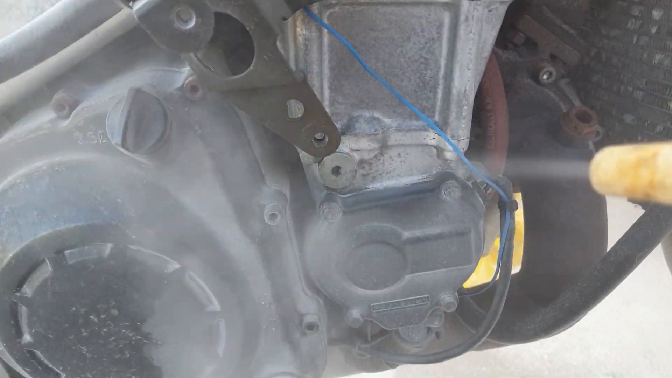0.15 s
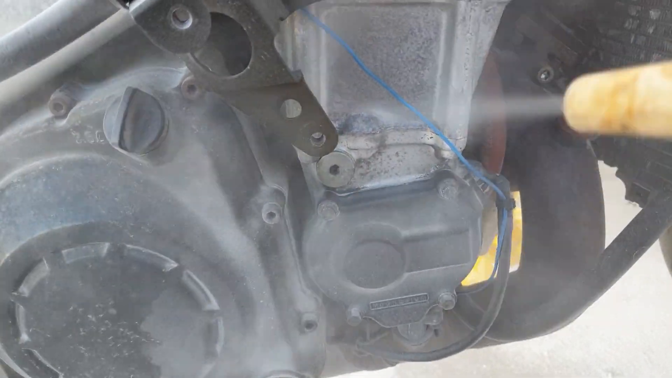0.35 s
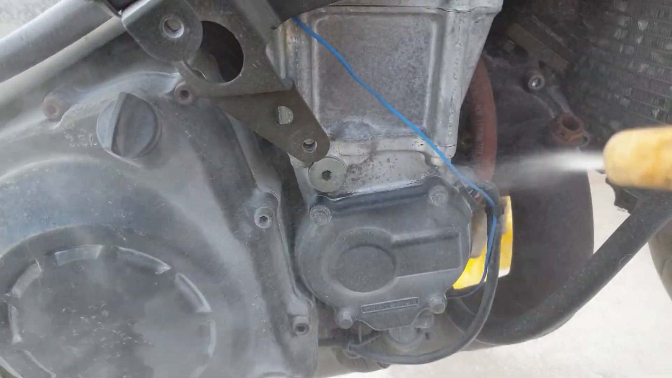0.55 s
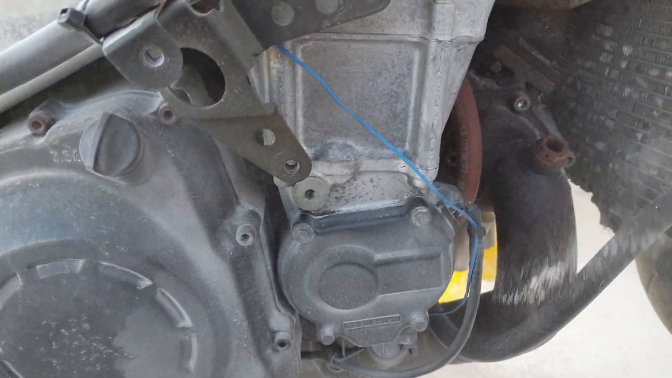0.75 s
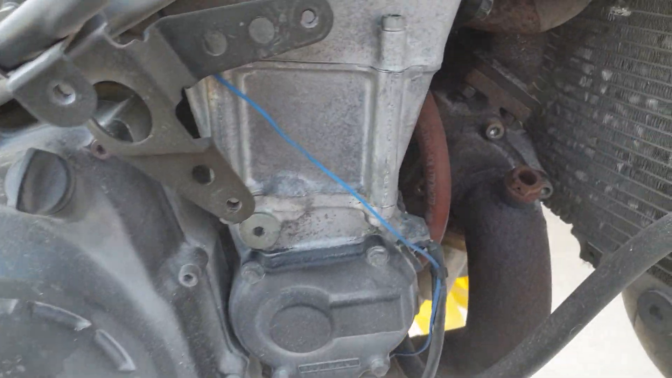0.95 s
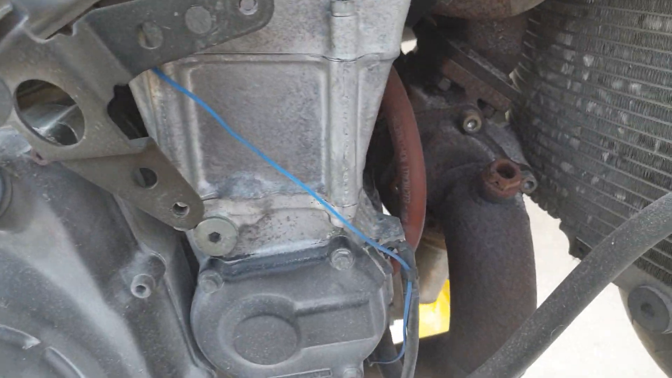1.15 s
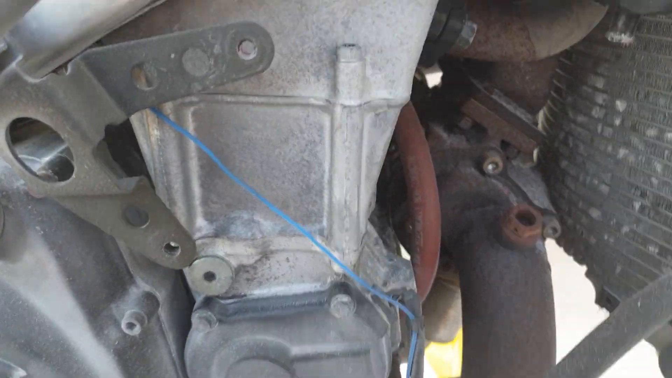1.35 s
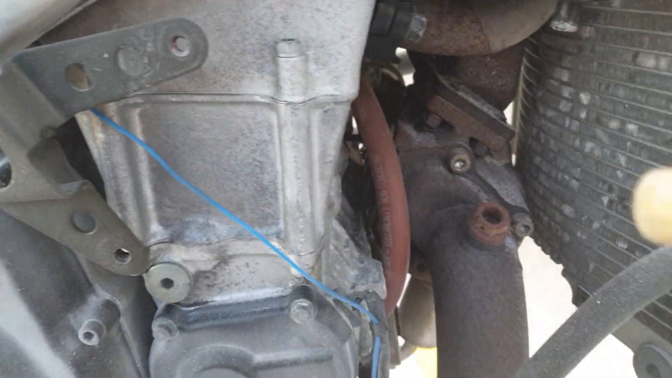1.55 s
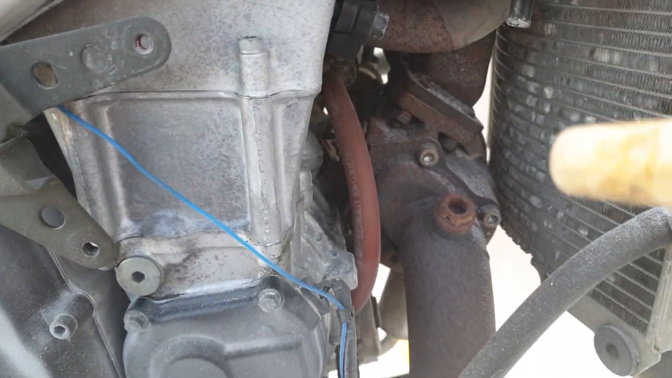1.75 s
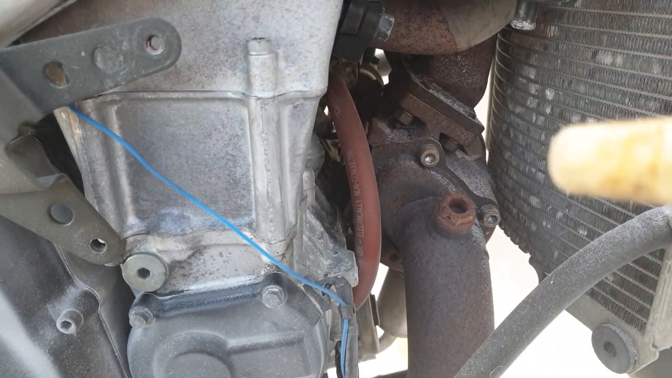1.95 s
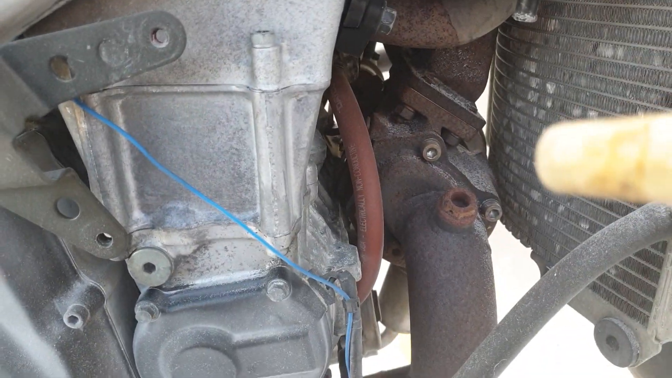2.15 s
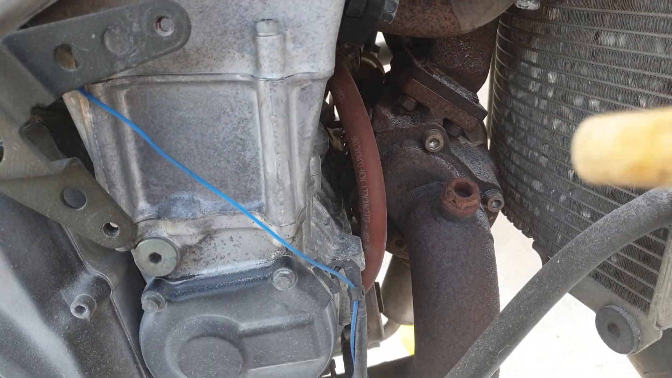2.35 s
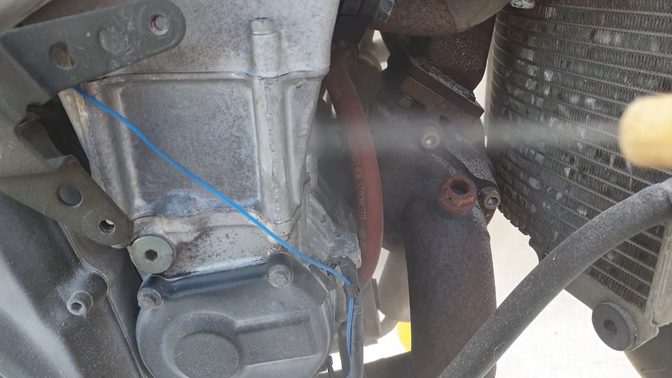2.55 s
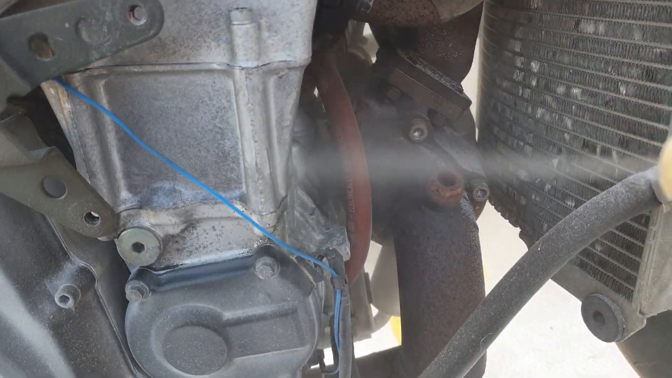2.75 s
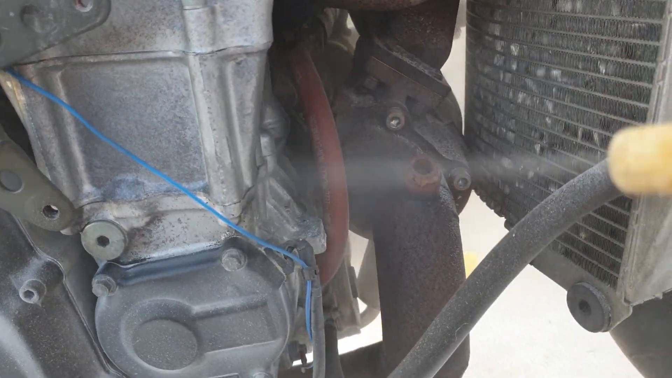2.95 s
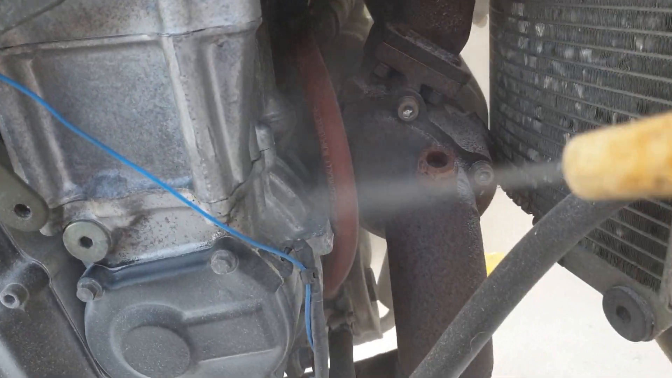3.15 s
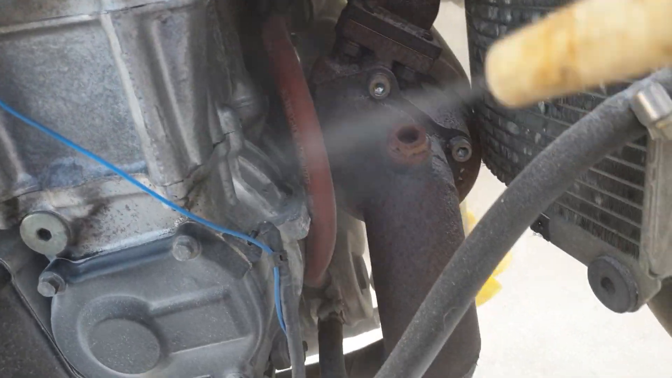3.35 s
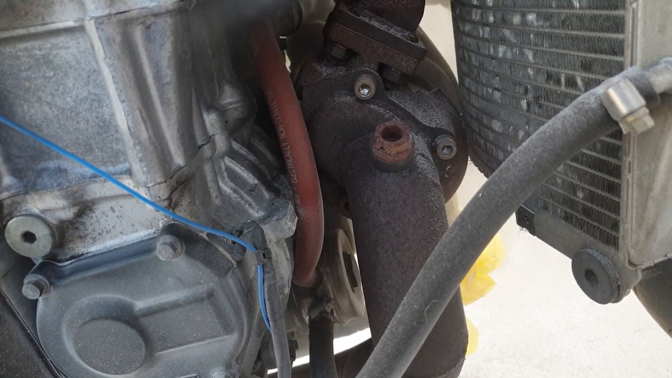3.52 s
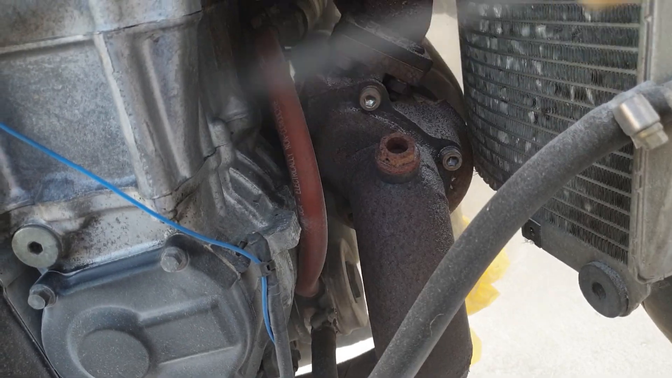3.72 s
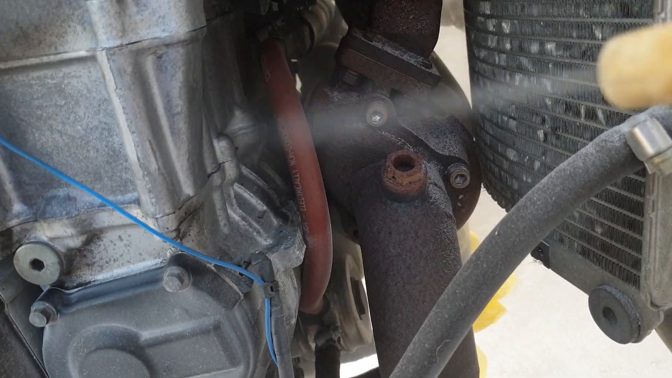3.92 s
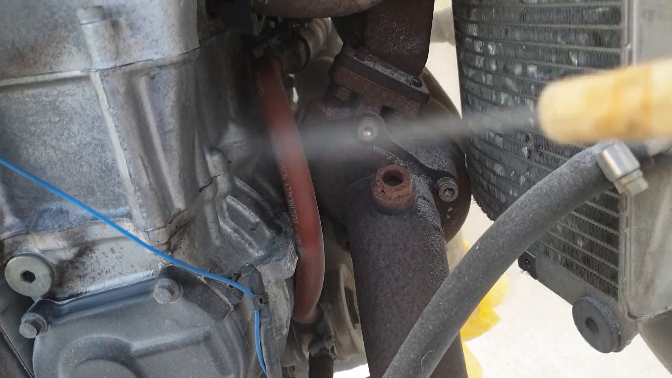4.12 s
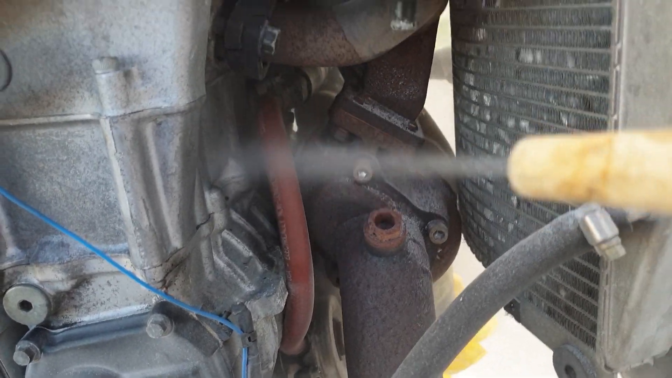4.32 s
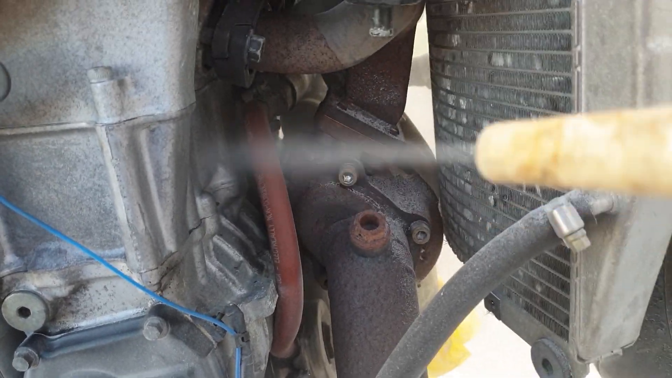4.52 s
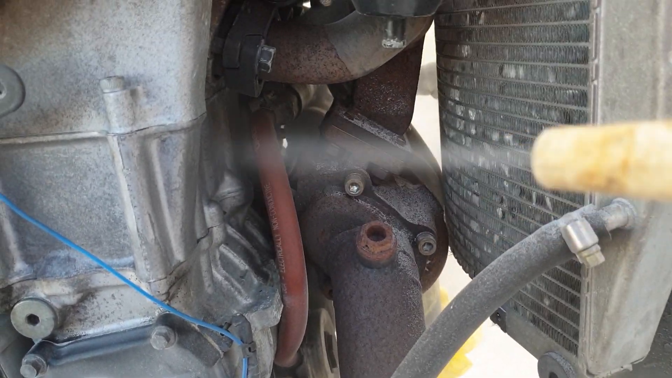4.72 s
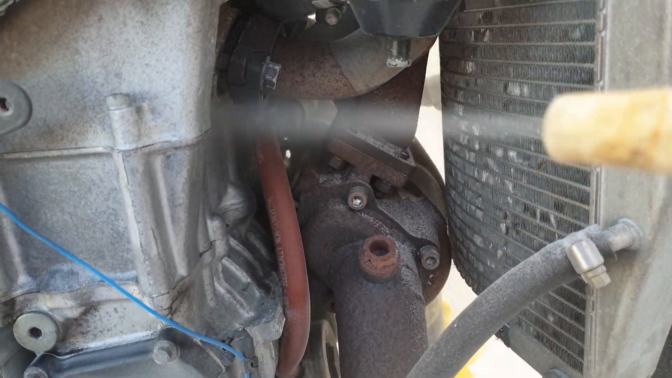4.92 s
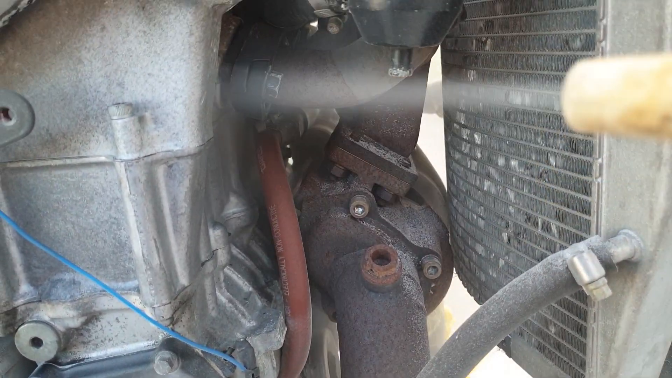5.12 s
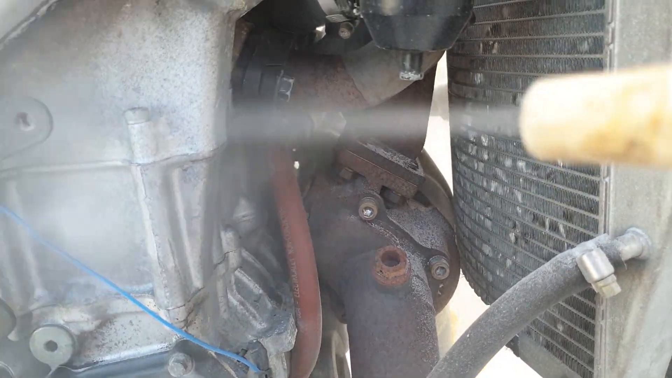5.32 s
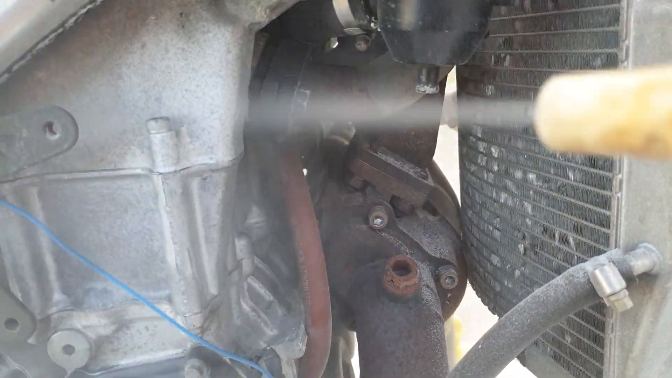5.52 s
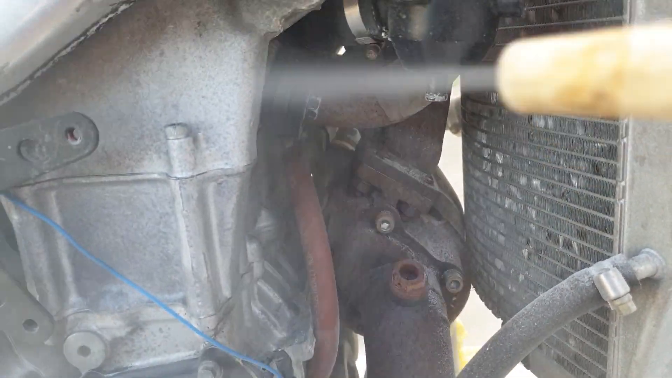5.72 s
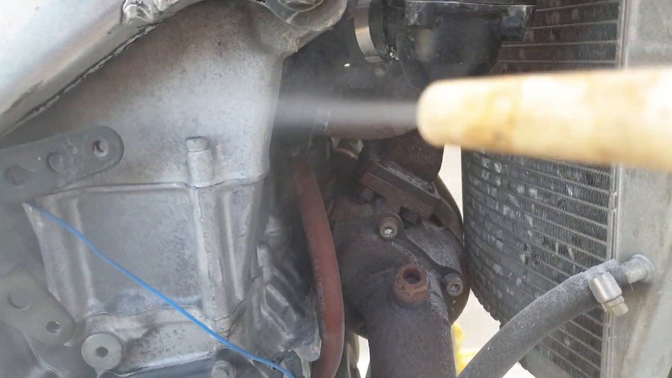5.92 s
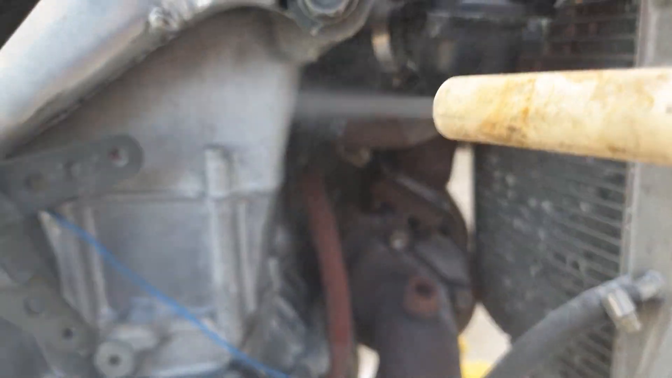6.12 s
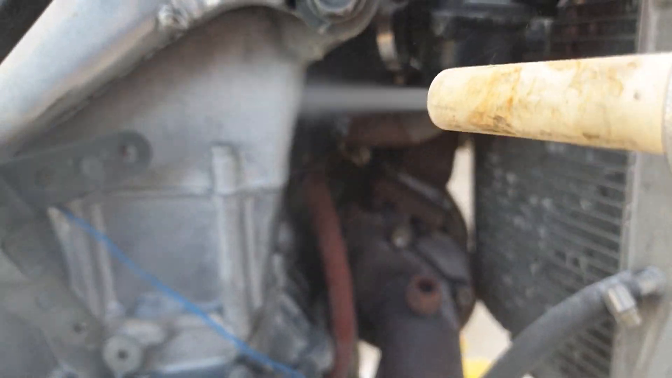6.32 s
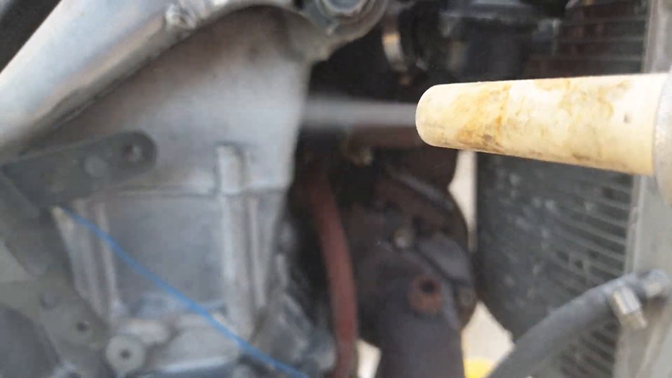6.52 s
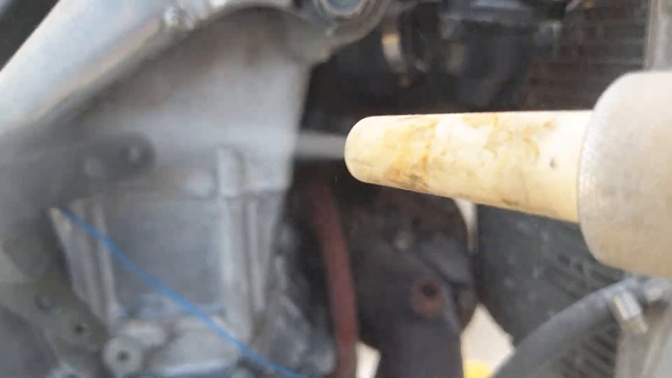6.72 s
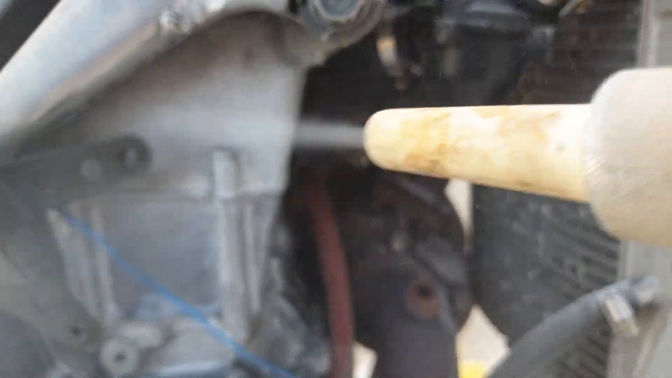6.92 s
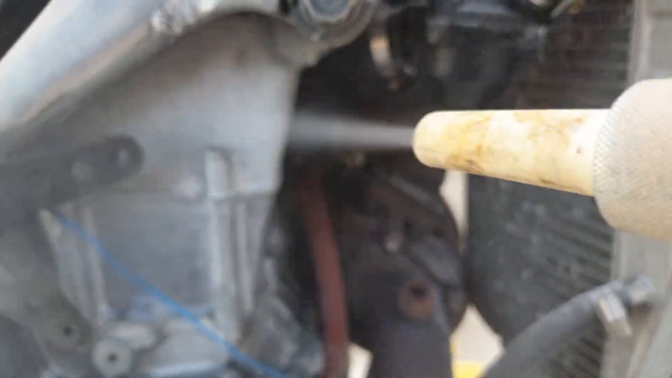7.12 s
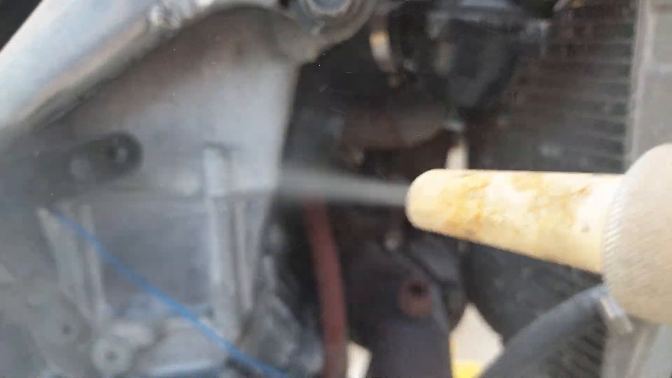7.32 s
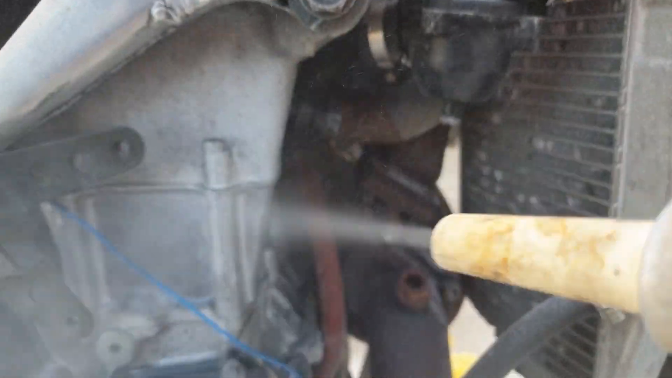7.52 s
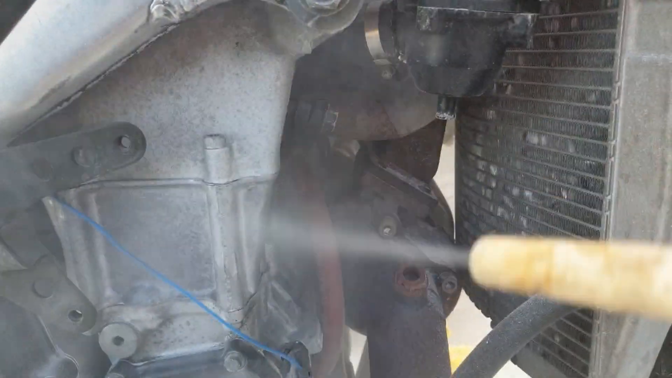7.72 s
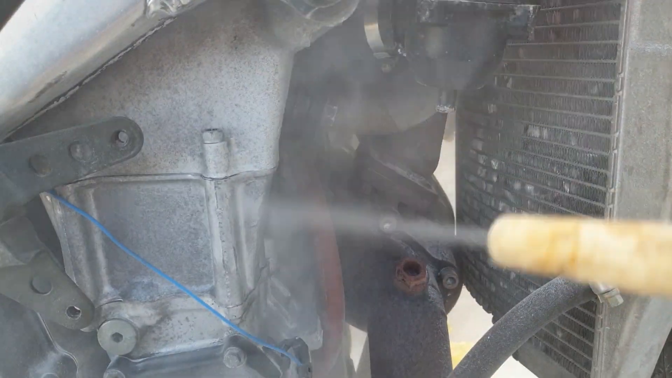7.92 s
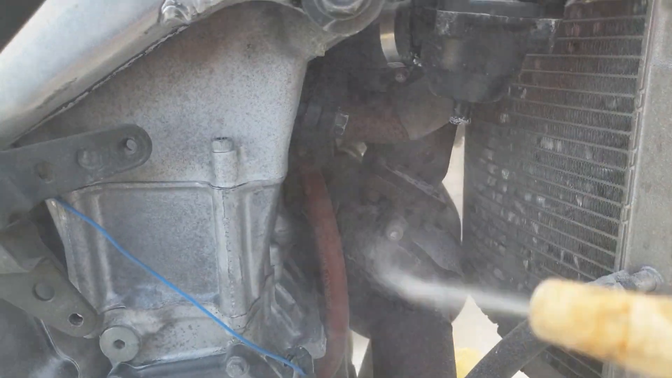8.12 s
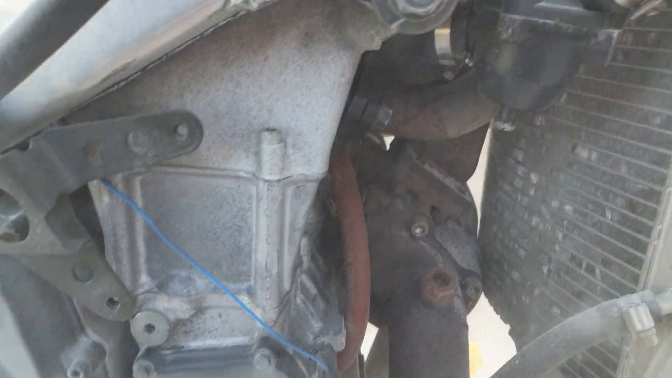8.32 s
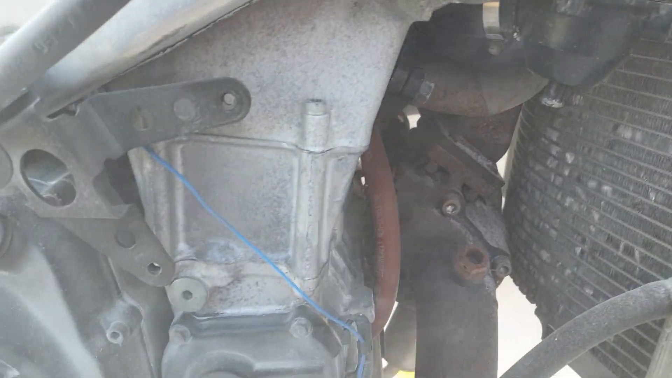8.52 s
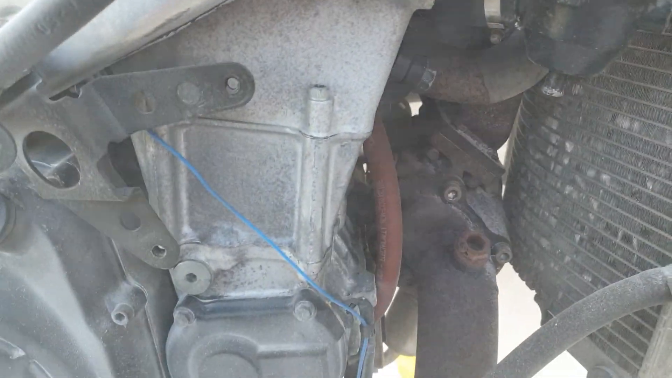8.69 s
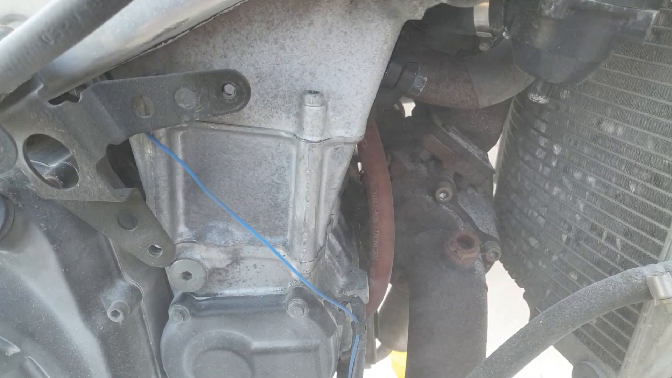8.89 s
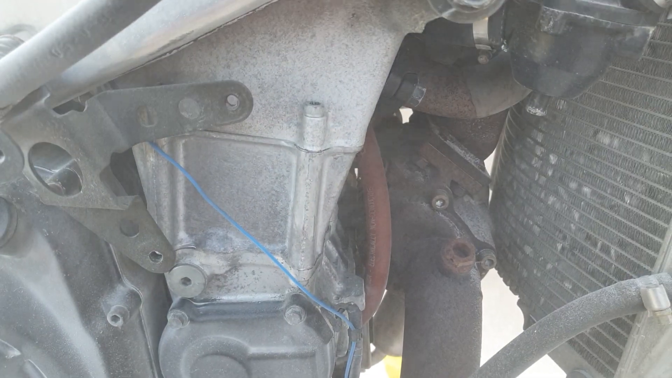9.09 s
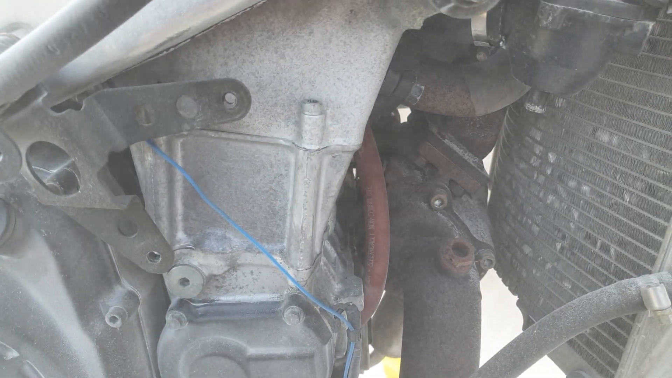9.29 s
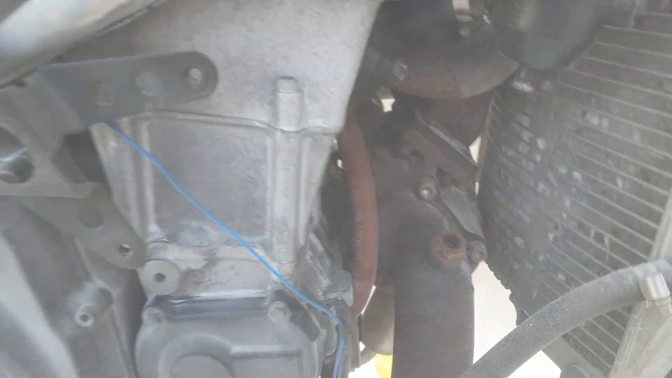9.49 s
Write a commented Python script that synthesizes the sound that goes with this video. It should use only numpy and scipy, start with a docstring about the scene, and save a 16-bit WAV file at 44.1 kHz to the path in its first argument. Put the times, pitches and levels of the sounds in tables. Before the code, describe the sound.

A dense, very bright hiss of compressed air and powder is already running at 0 s, close and leaning left, rushing over an edge and then sizzling off a metal cover. At about 0.6 s the valve cuts it within milliseconds, leaving a tiny short echo and near silence: faint low rumble, distant wash, weak motor hum. The rumble rises slightly before 2.6 s, when the jet bursts back with a soft low thump and an extra surge. It runs steadily, slightly gritty, with drifting metallic ripples: an edgy rush near 3.4 s, a hollow swell at 4.3 s, a stronger roar at 5.4 s with low air puffs up to 5.9 s, brighter sizzle and quick rushes from 6.3 to 7.1 s, then throaty roars at 7.5, 7.7 and 8.1 s. It snaps off at 8.15 s. Until 9.5 s only quiet rumble, wash and a very faint hollow air seep remain.

```python
"""Soda blasting an engine in a workshop

A soda blasting nozzle plays over a motorcycle engine in two bursts, close to a microphone with two ports.
The first burst is already running. Shaped noise makes the hissing jet and its strikes: a roar in hollows,
a rush over edges, a sizzle on flat metal. A valve cuts the flow sharply, with a low thump as it opens.
Behind it lie a short workshop echo, rumble, a distant wash and a motor hum; after the second burst
a faint seep of air blows the bore of the shut nozzle."""
import sys
import numpy as np
from scipy import signal
from scipy.fft import rfft, irfft
from scipy.io import wavfile

SR = 44100
rng = np.random.default_rng(int(sys.argv[2]) if len(sys.argv) > 2 else 0)


def pcm_store(signal):
    """Save signal as 16-bit PCM."""
    levels = np.round(np.clip(np.atleast_2d(signal), -1, 1) * 32767)
    wavfile.write(sys.argv[1], SR, levels.astype(np.int16).T)


N = 421155
FRAME, HOP = 1024, 256  # samples
TIME = np.arange(N) / SR
HZ = np.fft.rfftfreq(FRAME, 1 / SR)
FRAME_S = np.arange(-(-N // HOP) + 1) * HOP / SR

# In colours level_db is relative; in strengths it is dB per Hz. A positive side_db leans left.
# Trigger of the valve: open_s, shut_s, level_db of the last air left in the hose
BURSTS = [(-0.6, 0.582, -53.5), (2.569, 8.149, -41)]
# Colour of the free jet: freq_hz, level_db
JET_COLOUR = [(40.0, -24), (70.0, -21), (220.0, -21), (450.0, -19), (1700.0, -16.5), (3400.0, -18),
              (5000.0, -16), (7100.0, -7.5), (8300.0, -13), (9600.0, -9), (11200.0, -4.5), (12800.0, -6.5),
              (14400.0, -2.1), (15700.0, -1.5)]
# Strength of the free jet at working pressure, stronger as the nozzle comes nearer: time_s, level_db
JET_STRENGTH = [(0.0, -54.5), (0.3, -57.5), (0.58, -55), (2.6, -53.5), (4.7, -54), (5.5, -52), (6.6, -54),
                (8.15, -53)]
# Where the nozzle points: time_s, side_db
NOZZLE_AIM = [(0.3, -8), (2.58, -2), (3.7, -4.5), (5.4, -1), (7.3, -2.5), (8.15, -0.8)]
# How much later the jet reaches the left port: time_s, lag_ms
JET_LAG = [(.58, 0.11), (2.6, 0.074), (3.5, 0.11), (5.0, 0.065), (6.0, 0.017), (7.0, 0.019), (8.15, 0.02)]
# Colour of air caught in hollows between the parts: freq_hz, level_db
HOLLOW_COLOUR = [(75.0, -46), (150.0, -13.5), (330.0, -15), (450.0, -2.5), (830.0, -0.5), (1250.0, 0.5),
                 (1650.0, 1.3), (2400.0, -4.5), (4000.0, -23), (6000.0, -41.5)]
# Spray that always finds its way between the parts: time_s, level_db
HOLLOW_SPRAY = [(0.0, -67.5), (2.6, -66), (3.6, -68), (4.8, -76.5), (5.4, -70), (7.4, -67)]
# The jet swings straight into a hollow: deepest_s, level_db, leave_s
HOLLOW_HITS = [(2.63, -64.5, 0.18), (4.33, -69, .08), (5.39, -57, 0.29), (7.50, -62, 0.055),
               (7.74, -57.5, 0.18), (8.07, -60.5, 0.072)]
# Resonances of the hollows between the parts: freq_hz, width_hz, boost_db
CAVITIES = [(460.6, 67, 5), (574.6, 46, 5), (805, 70, 4.5), (945, 88, 4), (1140, 87, -1.5), (1690, 74, 1),
            (1800, 63, -0.5), (2157, 120, -1.5), (2740, 150, 0.5)]
# Colour of air split by ribs and edges: freq_hz, level_db
EDGE_COLOUR = [(600, -46.5), (1200, -7), (1500, -4), (1750, -0.5), (2200, 1), (2750, -0.5), (3200, -5.5),
               (4300, -7.5), (6000, -14.5), (9000, -17), (11700, 0.5), (13200, -7), (15300, -4)]
# Spray that always grazes some rib: time_s, level_db
EDGE_SPRAY = [(0.3, -66.5), (2.6, -71.5), (5.0, -75), (6.9, -70.5), (7.6, -66.5)]
# The jet sweeps across an edge: middle_s, length_s, level_db
EDGE_CROSSINGS = [(0.10, 0.088, -58.5), (3.38, 0.3, -62.5), (6.32, 0.066, -64), (6.55, .07, -61),
                  (6.79, .155, -55.5), (7.10, .11, -57)]
# Colour of air spreading over the flat cylinder wall: freq_hz, level_db
WALL_COLOUR = [(1750.0, -40), (3500.0, -21), (4800.0, -3), (6100.0, -2), (7000.0, -4), (8300.0, -18.5),
               (11800.0, -7), (15500.0, -5)]
# One slow pass on to the wall and off again: time_s, level_db
WALL_STRENGTH = [(0.3, -73.5), (3.3, -71.5), (5.0, -74.5), (5.6, -68), (6.4, -65), (7.2, -66), (7.8, -73),
                 (8.15, -88.5)]
# Gap between nozzle and wall, blown like a bottle: freq_hz, half_width_hz, level_db relative to the wall
WALL_GAP = [(309, 110, -3), (450, 90, -2.5), (1011, 94, -2), (1720, 130, -7), (2110, 200, -12),
            (6090, 260, 2.5)]
# Colour of air glancing off the round side cover: freq_hz, level_db
COVER_COLOUR = [(3000.0, -42.5), (6000.0, -26.5), (7500.0, -6.5), (9500.0, -11), (11200.0, -2),
                (12500.0, -4), (14000.0, -15.5), (21000.0, -38)]
# Strength on the side cover, which the jet leaves at the end of the first burst: time_s, level_db
COVER_STRENGTH = [(0, -62), (.1, -52), (.3, -58), (.45, -54.5), (.58, -61), (1.0, -110)]
# Puffs of air that reach the microphone: middle_s, half_length_s, level_db
PUFFS = [(4.88, 0.065, -69), (5.52, 0.11, -67), (5.85, 0.082, -63)]
# Colour of the puffs: freq_hz, level_db
PUFF_COLOUR = [(20, -24.5), (40, -4), (60, -1.5), (100, -4), (180, -2), (400, -17), (1500, -57.5)]
# Reflections from engine parts: left_ms, right_ms, strength (gain at high frequency)
GLINTS = [(.21, .33, 0.13), (.52, .67, 0.14), (.93, 1.21, 0.21), (1.72, 1.46, 0.25), (2.6, 3.5, 0.31),
          (4.3, 4.1, .18), (6.9, 6.9, .15), (12.3, 12, 0.17)]
# Colour difference of the two microphone ports: freq_hz, side_db
PORT_COLOUR = [(150.0, 1.5), (500.0, -0.9), (1000.0, 1), (1700.0, 3.5), (2700.0, 2.5), (3800.0, -5),
               (4800.0, -4), (5800.0, 2), (7200.0, 3.5), (8200.0, -6), (9400.0, -4.5), (11000.0, 0.3),
               (13000.0, 0.5), (14500.0, 2.5)]
# Likeness of jet sound at the two ports: freq_hz, likeness (correlation)
JET_LIKENESS = [(40, 0.51), (150, .55), (300, 0.5), (600, 0.85), (1000, .58), (1600, 0.27), (2800, 0.11),
                (7000, 0.22), (16000, .3)]
# An edge is a small, close source, heard more alike in part of the range: freq_hz, likeness (correlation)
EDGE_LIKENESS = [(1500, 0.91), (4000, 0.33), (16000, .45)]
# Workshop reverberation: freq_hz, t60_s
WORKSHOP_T60 = [(200, 0.34), (1000, 0.37), (4000, 0.6), (7000, 0.47), (15000, 0.35)]
# Bore resonances of the shut nozzle: freq_hz, half_width_hz, level_db
SEEP_BORE = [(400, 26, 4), (595, 26, 10), (755, 22, 9), (830, 40, 7.5), (1055, 50, 2), (1250, 90, -3),
             (1690, 50, 4), (1880, 330, -3), (2300, 250, -8), (2780, 130, -8), (3600, 500, -16),
             (5500, 700, -24), (7000, 750, -15), (10000, 3500, -27), (15000, 900, -27)]
# Strength of the seeping air: time_s, level_db
SEEP_STRENGTH = [(8.35, -128), (8.46, -100), (9.1, -99), (9.5, -93.5)]
# Colour of the workshop rumble: freq_hz, level_db
RUMBLE_COLOUR = [(20, -30), (35, -11), (52, 0), (75, 3), (110, -6), (145, -11.5), (200, -12), (370, -24),
                 (900, -42.5), (3000, -68.5)]
# Strength of the workshop rumble: time_s, level_db
RUMBLE_STRENGTH = [(.6, -88), (1.7, -85.5), (2.3, -74), (4.0, -81.5), (8.3, -75.5), (9.5, -72)]
# Colour of the distant wash of the surroundings: freq_hz, level_db
WASH_COLOUR = [(100, -13.5), (300, -5.5), (550, 0), (920, 0.5), (1400, -9), (2000, -14.5), (3000, -25.5),
               (4500, -29), (7000, -26.5), (15500, -32)]
# Strength of the distant wash: time_s, level_db
WASH_STRENGTH = [(1.6, -109), (2.2, -99), (2.55, -97), (8.3, -102.5), (9.5, -94)]
# Likeness at the two ports of sound from all around: freq_hz, likeness (correlation)
DIFFUSE_LIKENESS = [(40, 0.88), (150, .8), (400, 0.6), (800, 0.096), (1300, -.25), (2000, -.15),
                    (2800, .05), (16000, 0)]
# A distant motor, middle of its drift: pitch_hz, level_db
DISTANT_MOTOR = (145.3, -75.5)


def blast(between_modes_db=-3.0):
    """The jet, its strikes on the engine and the puffs are turbulent noise, all fed by one valve."""
    ring_db = between_modes_db
    for hz, width_hz, boost_db in CAVITIES:
        ring_db = ring_db + boost_db / (1 + (2 * (HZ - hz) / width_hz) ** 2)
    ring = amp(ring_db[:, None]) ** 2  # air between the parts sounds their resonances

    power = splash(JET_COLOUR, curve(JET_STRENGTH), side_db=curve(NOZZLE_AIM), flutter_db=0.5)
    power += splash(HOLLOW_COLOUR, in_hollows(), side_db=2.0, flutter_db=1.44) * ring
    power += splash(WALL_COLOUR, curve(WALL_STRENGTH), side_db=16.5, flutter_db=1.24)
    power += resonances(WALL_GAP)[:, None] * amp(curve(WALL_STRENGTH)) ** 2
    power += splash(COVER_COLOUR, curve(COVER_STRENGTH), side_db=-4.0, flutter_db=1.2)
    for middle_s, half_s, db in PUFFS:
        swell = np.exp(-((FRAME_S - middle_s) / half_s) ** 2)
        power += amp(db + colour(PUFF_COLOUR)) ** 2 * swell
    edge_power = splash(EDGE_COLOUR, on_edges(), side_db=2.0, flutter_db=0.74) * ring

    path = ports() * reflections()
    air = turbulence(np.sqrt(power) * path, JET_LIKENESS)
    air += turbulence(np.sqrt(edge_power) * path, EDGE_LIKENESS)
    return air * valve() * powder()


def splash(shape, strength_db, side_db, flutter_db):
    """Power of one kind of air noise; it follows the pressure and flutters as the stream wobbles."""
    level_db = colour(shape) + strength_db + pressure() + flutter_db * wander(30)
    return (amp(level_db) * pan(side_db)) ** 2


def in_hollows(enter_s=0.14):
    """The roar swells exponentially as the jet enters a hollow and dies away as it slides out."""
    levels_db = [curve(HOLLOW_SPRAY)]
    for deepest_s, db, leave_s in HOLLOW_HITS:
        away = np.maximum((deepest_s - FRAME_S) / enter_s, (FRAME_S - deepest_s) / leave_s)
        levels_db.append(db - 20 * np.log10(np.e) * away)
    return together(levels_db)


def on_edges(steepness=4.6):
    """The rush holds while an edge is inside the jet and falls steeply on either side."""
    levels_db = [curve(EDGE_SPRAY)]
    for middle_s, length_s, db in EDGE_CROSSINGS:
        away = abs(2 * (FRAME_S - middle_s) / length_s)  # 1 at half power
        levels_db.append(db - 10 * np.log10(1 + away ** (2 * steepness)))
    return together(levels_db)


def pressure(stored_db=4, sag_s=0.18):
    """Decibels above working pressure: each burst starts on a full hose, which then sags."""
    return sum(stored_db * np.exp(-((FRAME_S - open_s) / sag_s) ** 2) for open_s, *_ in BURSTS)


def valve(open_ramp_s=0.013, bleed_s=0.0054, surge_db=2.0, surge_s=0.02, empty_s=0.096):
    """Flow starts with a surge of stored pressure and drops within milliseconds; then the hose empties softly."""
    flow = np.zeros(N)
    for open_s, shut_s, rest_db in BURSTS:
        age = np.maximum(TIME - open_s, 0)
        since_shut = np.maximum(TIME - shut_s, 0)
        opening = np.minimum(age / open_ramp_s, 1)
        surge = amp(surge_db * np.exp(-age / surge_s))
        closing = np.exp(-since_shut / bleed_s) + amp(rest_db) * np.exp(-since_shut / empty_s)
        flow += opening * surge * closing
    return flow


def powder(clump_db=0.21, clump_hz=160):
    """The powder feeds in small clumps, low-passed noise in the level, that roughen the stream."""
    pole = np.exp(-2 * np.pi * clump_hz / SR)
    clumps = signal.lfilter([1], [1, -pole], rng.standard_normal(N))
    return amp(clump_db * clumps / clumps.std())


def thump(db=-34, hz=78, rise_s=0.0087):
    """The first slug of air in a burst leaves the hose with a soft low thump, a short swelling sine."""
    total = np.zeros(N)
    for open_s, *_ in BURSTS:
        age = np.maximum(TIME - open_s, 0)
        envelope = age / rise_s * np.exp(1 - age / rise_s)
        total += envelope * np.sin(2 * np.pi * hz * age)
    return amp(db) * total


def reflections(sway=.06, hand_hz=2.0, small_parts_hz=800):
    """Nearby metal throws short waves back; the paths shift with the hand, so ripples drift through the hiss."""
    f = HZ[:, None]
    total, power = 1, 1
    for left_ms, right_ms, strength in GLINTS:
        delay_s = np.array([left_ms, right_ms])[:, None, None] / 1000
        delay_s = delay_s * (1 + sway * wander(hand_hz))
        size = strength * f / (f + small_parts_hz)  # small parts reflect little bass
        total = total + size * np.exp(-2j * np.pi * f * delay_s)
        power = power + size ** 2
    return total / np.sqrt(power)


def ports():
    """Each microphone port has its own colour, and the jet reaches the left one slightly later."""
    late = np.exp(-2j * np.pi * HZ[:, None] * curve(JET_LAG) / 1000)
    return pan(colour(PORT_COLOUR)) * np.array([late, np.ones_like(late)])


def room(x, near_db=-19, near_t60=0.12, far_db=-39, dull_hz=9000):
    """A quick scatter around the motorcycle, then the faint tail of the workshop; both lose some treble."""
    hz, t, z = signal.stft(rng.standard_normal((2, SR // 2)), SR, nperseg=256)
    z = z / np.hypot(1, hz / dull_hz)[:, None]
    near = signal.istft(z * 1000. ** (-t / near_t60), SR)[1]  # a factor of 1000 is 60 dB
    far = signal.istft(z * 1000. ** (-t / colour(WORKSHOP_T60, hz)), SR)[1]
    tail = amp(near_db) * near / np.linalg.norm(near[0])
    tail = tail + amp(far_db) * far / np.linalg.norm(far[0])
    return signal.fftconvolve(x, tail, axes=1)[:, :N]


def seep(lag_ms=.46, likeness=.5):
    """A trickle of air blows the bore of the shut nozzle, held off to the right so the left port hears it late."""
    f = np.fft.rfftfreq(N, 1 / SR)
    right, other = rfft(rng.standard_normal((2, N)))
    left = likeness * right * np.exp(-2j * np.pi * f * lag_ms / 1000)
    left += np.sqrt(1 - likeness ** 2) * other
    bore = np.sqrt(resonances(SEEP_BORE, f) * SR / 2)
    air = irfft(np.array([left, right]) * bore, N)
    return air * amp(np.interp(TIME, *np.transpose(SEEP_STRENGTH)))


def motor(drift_hz=1.0, waver_db=2):
    """A faint distant hum, one sine that wavers in pitch and level."""
    hz, db = DISTANT_MOTOR
    drift = np.interp(TIME, FRAME_S, wander(5.4))
    waver = np.interp(TIME, FRAME_S, wander(5.4))
    phase = 2 * np.pi * np.cumsum(hz + drift_hz * drift) / SR
    return amp(db + waver_db * waver) * np.sin(phase)


def background(throb_db=1.5, waver_db=1.9, wash_side_db=-2.5):
    """Low rumble and a distant wash, noise arriving from all around, the wash leaning right."""
    rumble = amp(colour(RUMBLE_COLOUR) + curve(RUMBLE_STRENGTH) + throb_db * wander(23))
    wash = amp(colour(WASH_COLOUR) + curve(WASH_STRENGTH) + waver_db * wander(8.7))
    wash = wash * pan(wash_side_db)
    return turbulence(np.sqrt(rumble ** 2 + wash ** 2), DIFFUSE_LIKENESS)


def turbulence(field, likeness):
    """Noise with the given strength per root Hz, partly shared by the two ports."""
    noise = rng.standard_normal((2, N))
    left, other = signal.stft(noise, nperseg=FRAME, noverlap=FRAME - HOP)[2]
    same = np.clip(colour(likeness), -1, 1)
    right = same * left + np.sqrt(1 - same ** 2) * other
    z = np.array([left, right]) * field
    return np.sqrt(SR / 2) * signal.istft(z, nperseg=FRAME, noverlap=FRAME - HOP)[1][:, :N]


def resonances(modes, f=HZ):
    """Power response of a few peaks, each a quarter of its top at half_width_hz to either side."""
    return sum(amp(db) ** 2 / (1 + ((f - hz) / width) ** 2) ** 2 for hz, width, db in modes)


def wander(rate_hz):
    """Smooth chance of unit size, one value a frame: sines up to rate_hz in random phase."""
    f = np.geomspace(rate_hz / 10, rate_hz, num=24)[:, None]
    drift = np.sin(2 * np.pi * (f * FRAME_S + rng.random(f.shape))).sum(0)
    return drift / drift.std()


def together(levels_db):
    """Level of several independent noises sounding at once: their powers add."""
    return 10 * np.log10(sum(amp(db) ** 2 for db in levels_db))


def amp(db):
    """Decibels to gain."""
    return 10 ** (np.asarray(db) / 20)


def pan(db):
    """Left and right gains for a level difference; positive leans left."""
    return np.array([amp(np.atleast_2d(db) / 2), amp(-np.atleast_2d(db) / 2)])


def colour(points, hz=HZ):
    """Reads a table over log frequency, as a column."""
    f, value = np.transpose(points)
    return np.interp(np.log(hz + 1), np.log(f + 1), value)[:, None]


def curve(points):
    """Reads a table over time, one value a frame."""
    return np.interp(FRAME_S, *np.transpose(points))


def scene():
    """The blast, its echo, the idle nozzle and the workshop."""
    jet = blast() + thump()
    return jet + room(jet) + seep() + background() + motor()


def record(dry, low_cut_hz=42, band_limit_hz=15850):
    """The microphone's bass cut and the recorder's steep band limit."""
    bass_cut = signal.butter(N=3, Wn=low_cut_hz, btype="high", fs=SR, output="sos")
    thinned = signal.sosfilt(bass_cut, dry)
    lowpass = signal.firwin(1023, band_limit_hz, window=("kaiser", 8), fs=SR)
    return signal.oaconvolve(thinned, lowpass[None], "same")


dry = scene()
out = record(dry)
pcm_store(out)
```